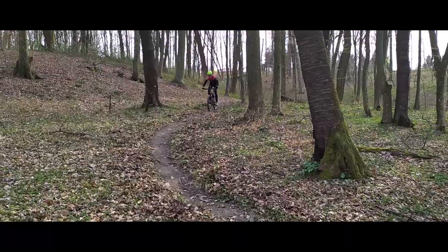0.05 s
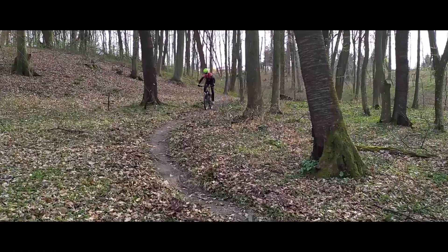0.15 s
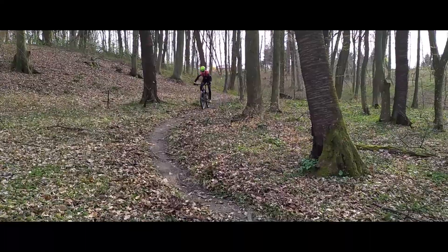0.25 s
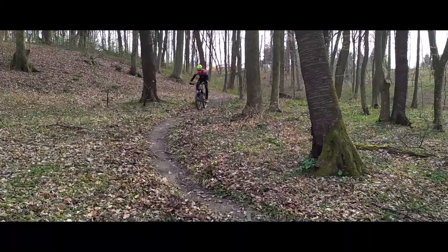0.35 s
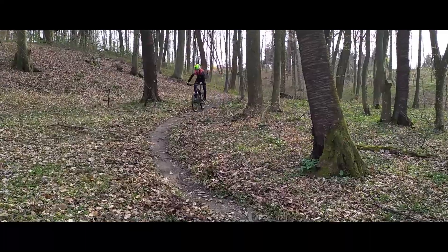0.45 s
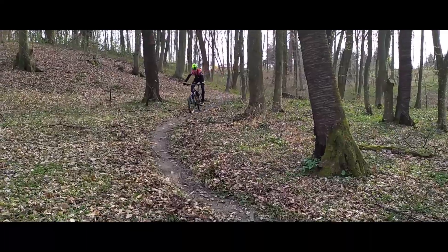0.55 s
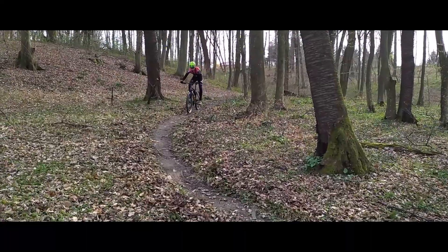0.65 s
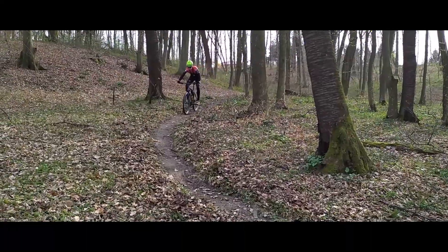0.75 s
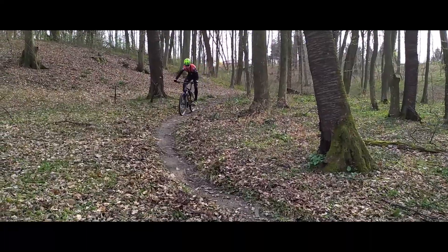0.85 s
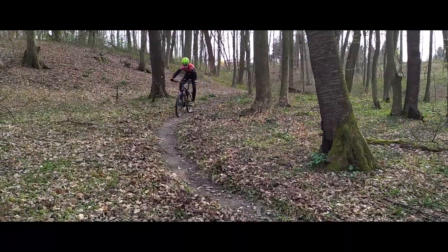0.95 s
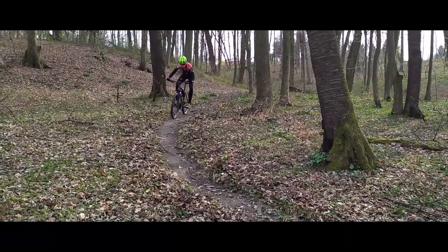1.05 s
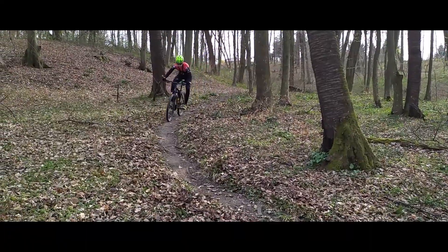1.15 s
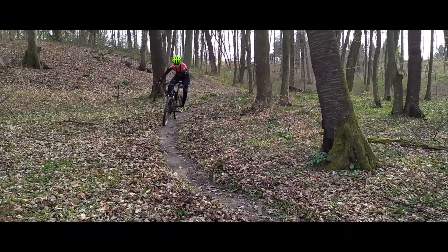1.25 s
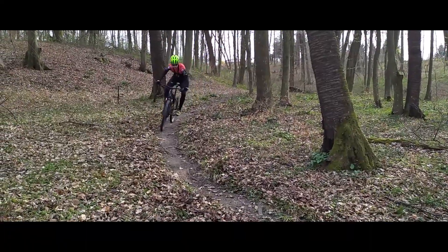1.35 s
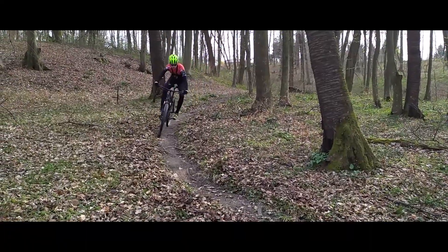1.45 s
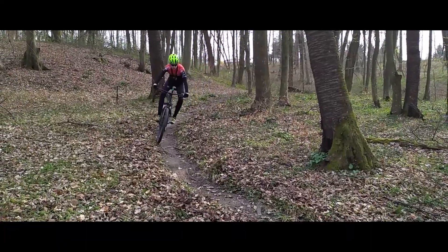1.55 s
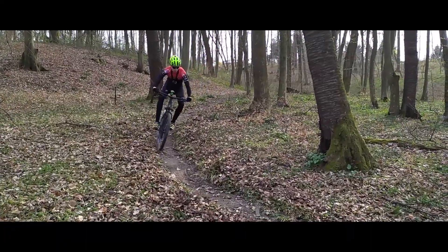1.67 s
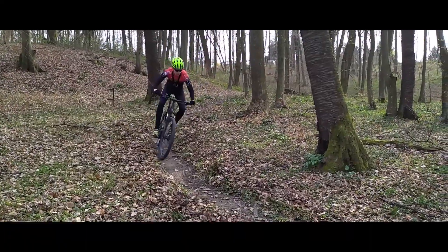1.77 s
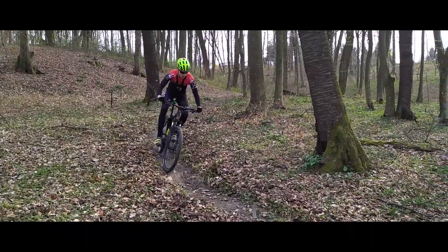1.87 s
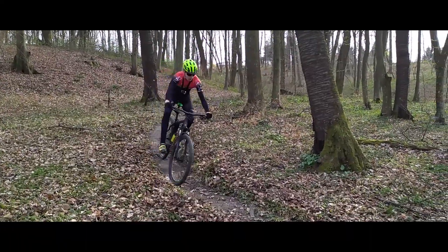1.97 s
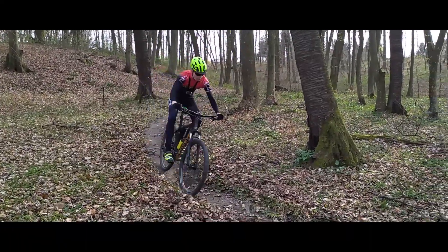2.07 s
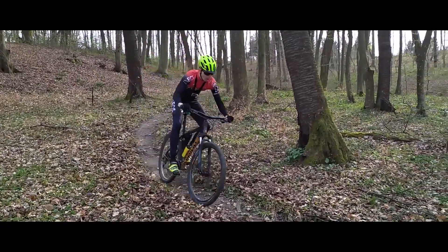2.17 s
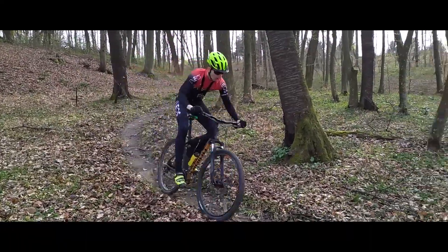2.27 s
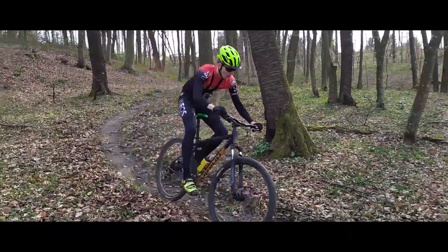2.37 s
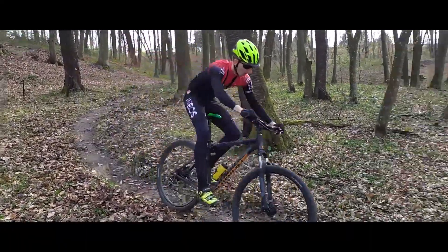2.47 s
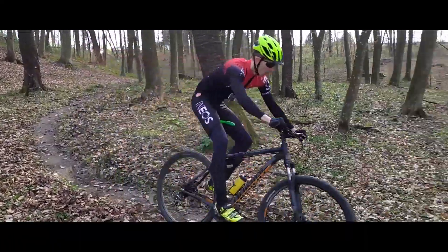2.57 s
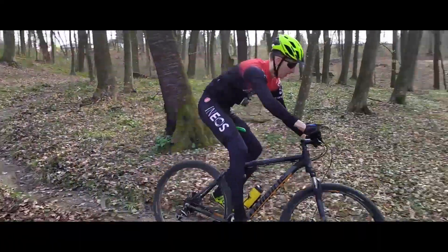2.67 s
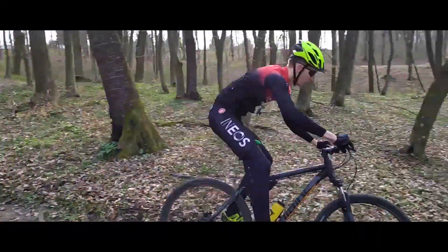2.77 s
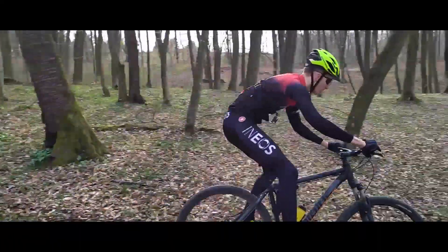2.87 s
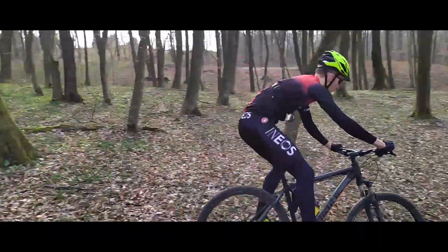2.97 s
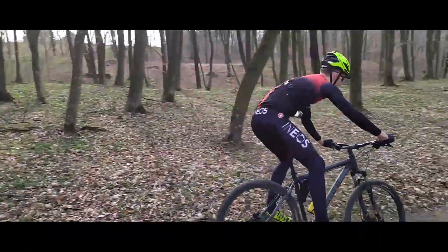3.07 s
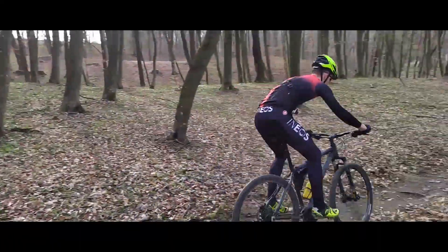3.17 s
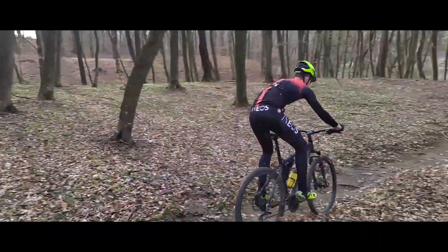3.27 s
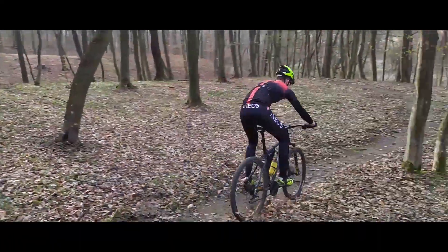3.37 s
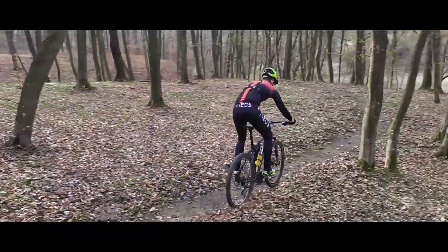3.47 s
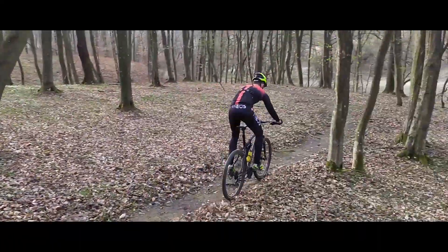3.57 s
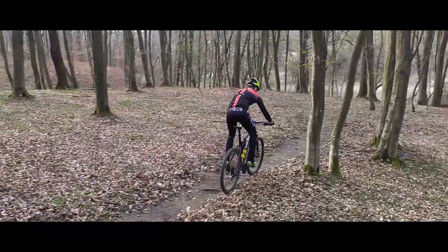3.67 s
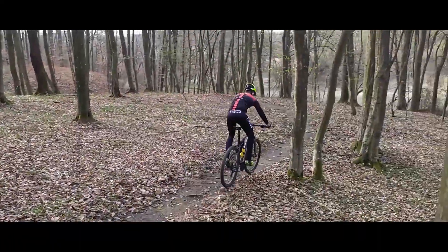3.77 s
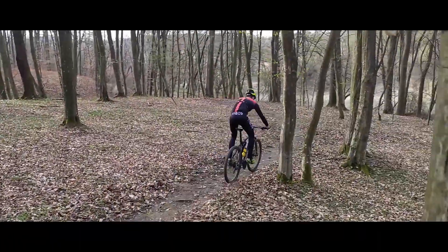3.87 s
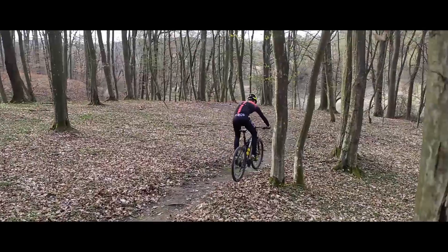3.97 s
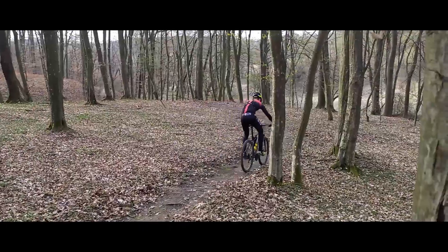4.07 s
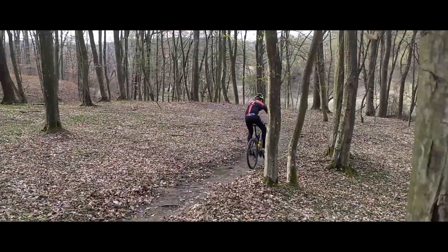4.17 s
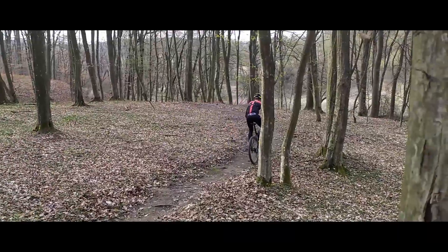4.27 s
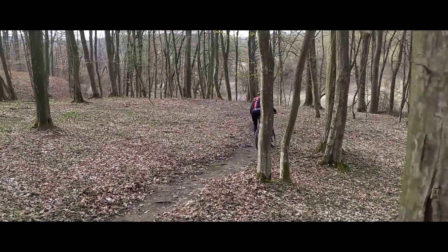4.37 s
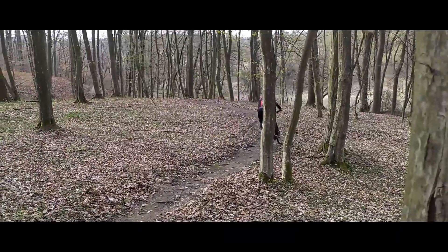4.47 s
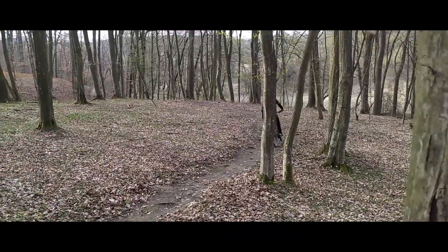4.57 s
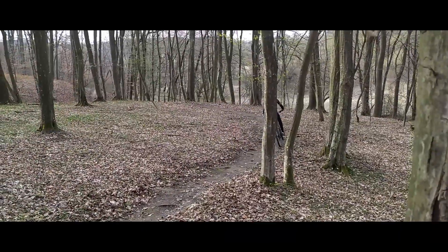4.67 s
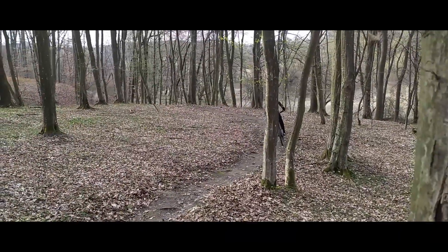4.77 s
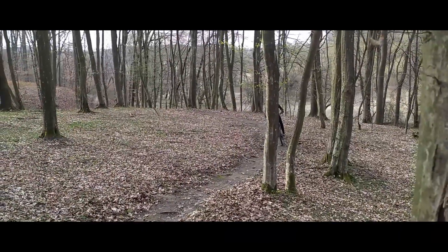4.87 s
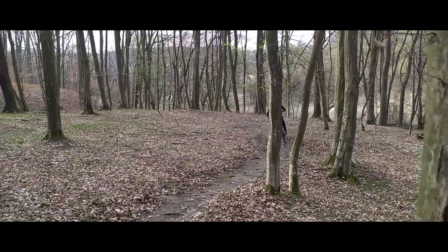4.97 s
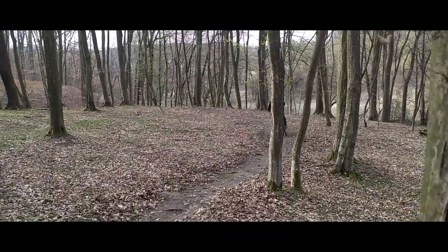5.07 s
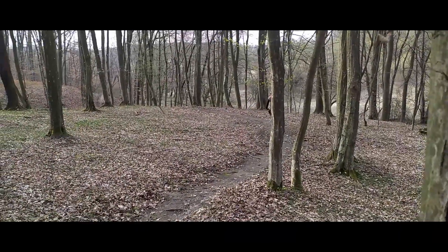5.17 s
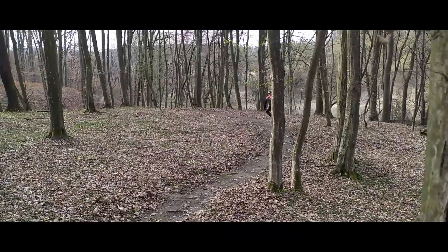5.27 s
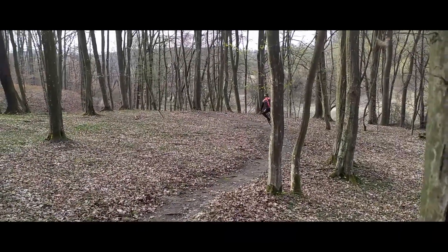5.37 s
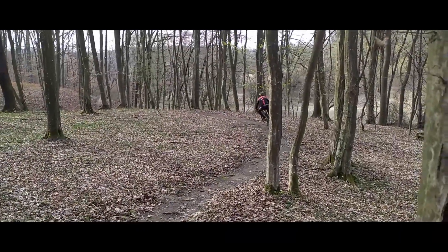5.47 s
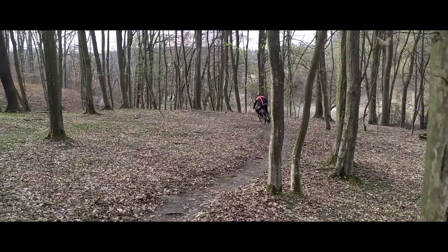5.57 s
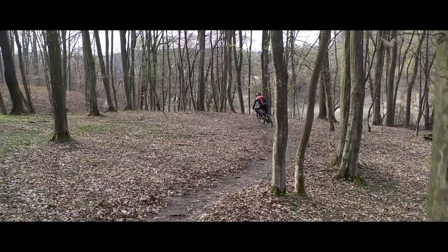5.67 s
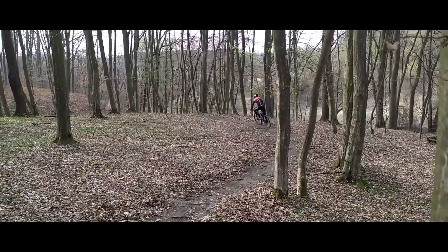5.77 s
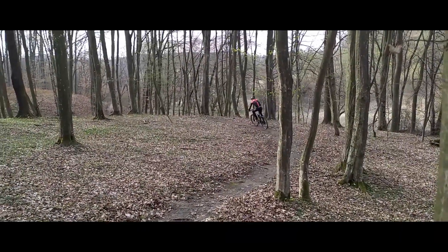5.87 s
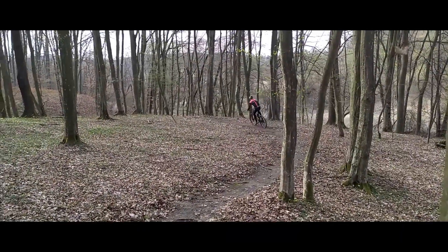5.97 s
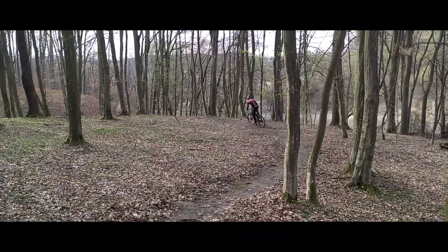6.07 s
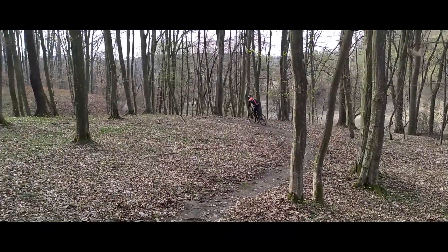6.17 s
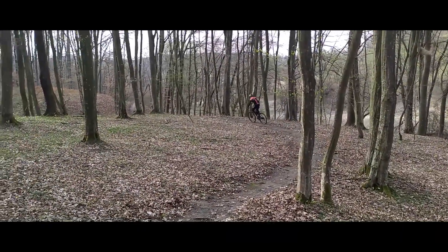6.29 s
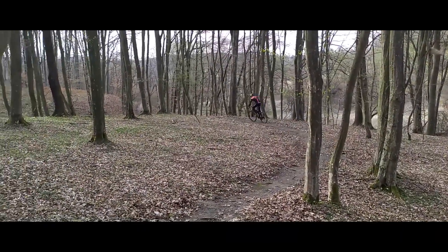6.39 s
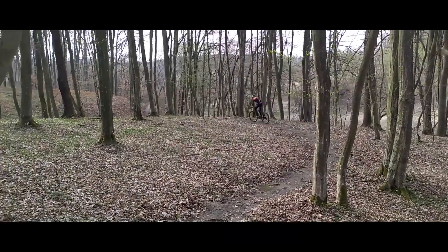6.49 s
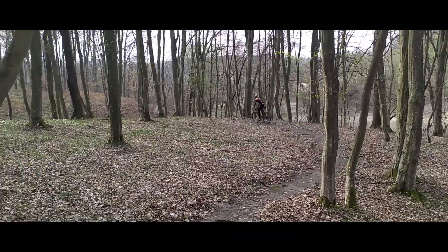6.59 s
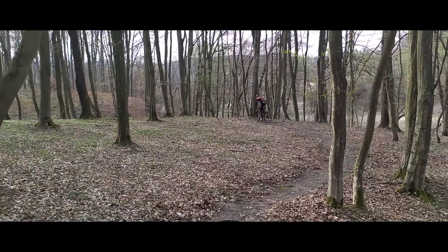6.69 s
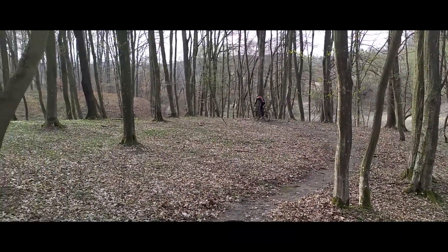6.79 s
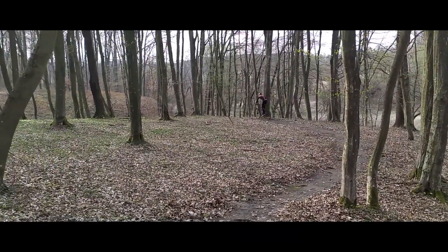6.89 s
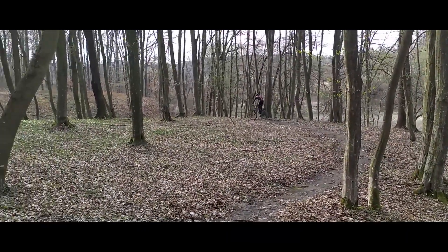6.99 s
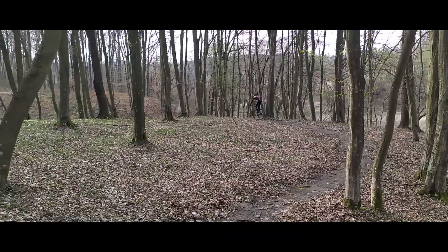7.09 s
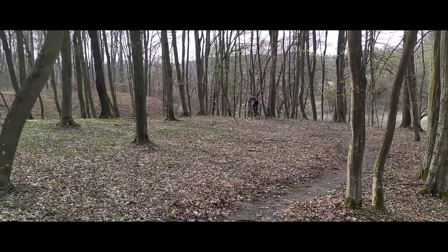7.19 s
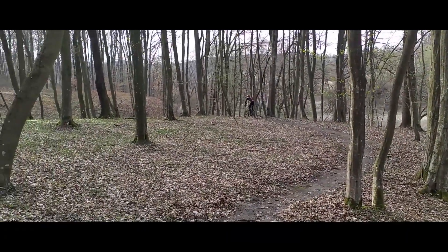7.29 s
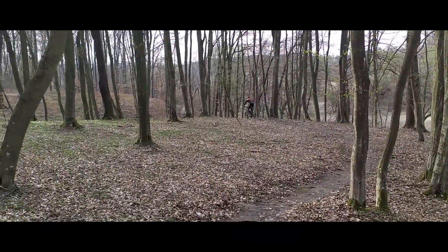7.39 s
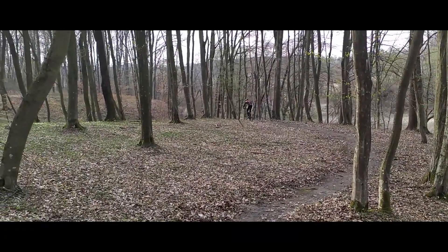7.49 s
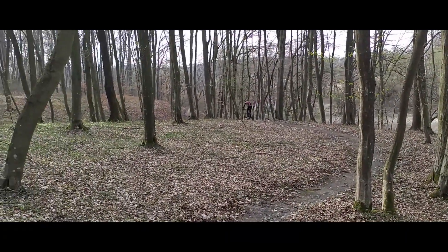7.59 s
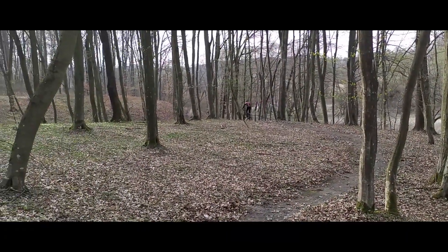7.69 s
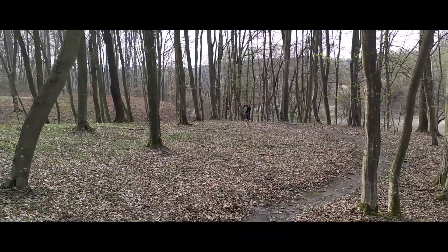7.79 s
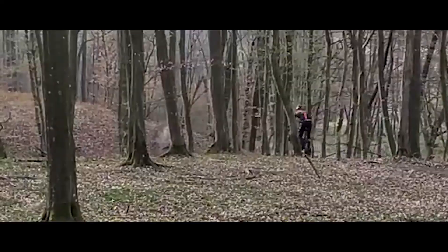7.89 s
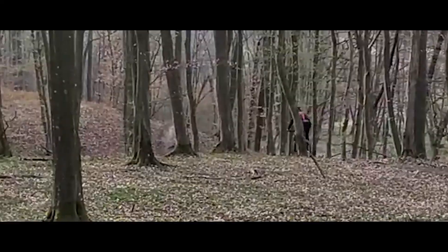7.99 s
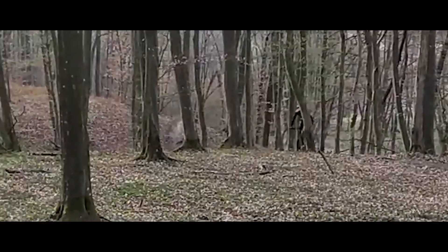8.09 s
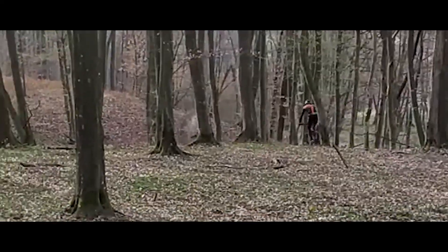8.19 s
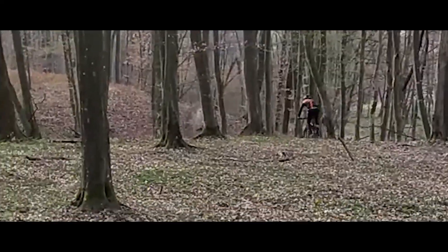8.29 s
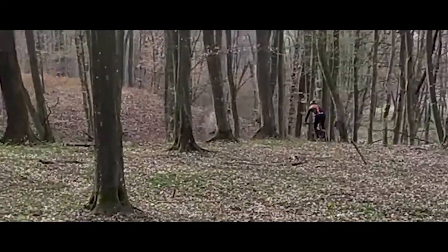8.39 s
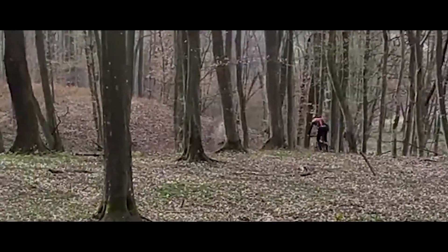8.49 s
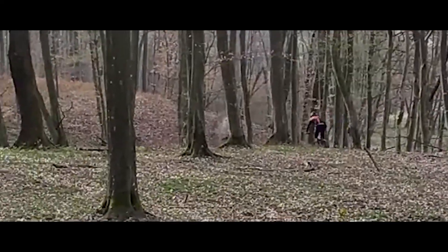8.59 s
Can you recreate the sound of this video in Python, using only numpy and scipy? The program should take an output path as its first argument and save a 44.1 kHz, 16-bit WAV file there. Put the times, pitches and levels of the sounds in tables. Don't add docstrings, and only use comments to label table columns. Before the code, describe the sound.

A mountain bike approaches through a quiet wood, tyres crackling over dry leaves and snapping twigs close by, then fades as a bird whistles.

```python
import sys
import numpy as np
from scipy import signal
from scipy.fft import rfft, irfft, next_fast_len
from scipy.io import wavfile
from scipy.ndimage import uniform_filter1d, minimum_filter1d, map_coordinates

SR = 44100
rng = np.random.default_rng(int(sys.argv[2]) if len(sys.argv) > 2 else 0)


def elevation(decibels):
    levels = np.asarray(decibels, float)
    return 10 ** (levels / 20)


def materialize(psi):
    bounded = np.clip(np.atleast_2d(psi).T, -1, 1)
    quanta = np.round(bounded * 32767).astype(np.int16)
    wavfile.write(sys.argv[1], SR, quanta)


N = 381024

# frequency_hz, level_db
LEAF = [(1180, -23.5), (2000, -19), (2700, -10), (3970, -7.5), (5400, -7), (6490, -6), (10700, -3),
        (14800, -10.5), (15800, -9.5), (16300, -62.5)]


def unit(x):
    return x / np.sqrt(np.mean(x ** 2) + 1e-20)


def along(points, hz):
    f, v = np.transpose(points)
    return np.interp(np.log(hz + 1), np.log(f + 1), v)


def wobble(rate):
    knots = rng.standard_normal(int(N * rate / SR) + 4)
    return map_coordinates(knots, [np.arange(N) * rate / SR])


def filtered(x, response):
    m = next_fast_len(x.shape[-1] + 1024)
    return irfft(rfft(x, m) * response(np.fft.rfftfreq(m, 1 / SR)), m)[..., :x.shape[-1]]


def pair(shape):
    # frequency_hz, likeness
    likeness = [(60, 0.97), (130, 0.84), (300, 1), (600, 0.093), (1500, 0.073), (4000, 0.15), (14000, 0.04)]
    turn = lambda hz: np.arccos(np.clip(along(likeness, hz), -1, 1)) / 2
    a, b = rng.standard_normal((2, *shape))
    mid = filtered(a, lambda hz: np.cos(turn(hz)))
    side = filtered(b, lambda hz: np.sin(turn(hz)))
    return np.array([mid + side, mid - side])


def grains(count, spread_db, life, bed):
    at, size = rng.random((2, count))
    hits = np.bincount((at * N).astype(int), elevation(-spread_db * np.log(size + 0.008)), N)
    return bed + unit(signal.lfilter([1], [1, -np.exp(-1 / (life * SR))], hits))


def patchy(x, depth_db):
    z = signal.stft(x, nperseg=256)[2]
    field = uniform_filter1d(rng.standard_normal(z.shape[1:]), size=14, axis=0)
    field = uniform_filter1d(field, size=9, axis=1)
    return signal.istft(z * elevation(depth_db * unit(field)), nperseg=256)[1][:, :N]


def panned(x, db):
    return x * elevation(np.array([db / 2, -db / 2]))


def placed(sounds, times):
    out = np.zeros((2, N + SR))
    for k, start in enumerate(np.round(np.ravel(times) * SR).astype(int)):
        out[:, start:start + sounds.shape[2]] += sounds[:, k]
    return out[:, :N]


def trunks(x, decay):
    hz, t, z = signal.stft(rng.standard_normal((2, SR // 2)), SR, nperseg=256)
    tail = signal.istft(z * elevation(-60 * t / along(decay, hz)[:, None]), SR, nperseg=256)[1]
    late = np.pad(x, (700, 0))[None]
    return signal.fftconvolve(late, tail / np.linalg.norm(tail[0]), axes=1)[:, :N]


def bearing(s):
    # start_s, left_right_db
    swing = [(0, -8), (1.2, -10.5), (1.9, -15.5), (2.5, -15.5), (2.75, -5), (3.9, -3.5), (5, -5),
             (8.64, -5)]
    return np.interp(s, *np.transpose(swing))


def hidden(s):
    broadside_s, open_s = 3.8, 1.48
    return 1 - np.exp(-((s - broadside_s) / open_s) ** 4)


def still_air():
    # frequency_hz, level_db
    air_curve = [(15, -27.5), (25, 0), (70, -6.5), (566, -36), (873, -26), (2960, -20), (9000, -18),
                 (16300, -30)]
    noise = unit(filtered(pair((N,)), lambda hz: elevation(along(air_curve, hz))))
    return elevation(-69 + 5.8 * wobble(2.61)) * noise


def ride():
    # start_s, level_db
    bite = [(0, -65), (.6, -56.5), (1.42, -60), (1.95, -53), (2.19, -43), (2.5, -44), (2.72, -34.5),
            (3.3, -30.5), (3.62, -44), (3.97, -46), (4.25, -57.5), (4.64, -55.5), (5.25, -62.5),
            (6.0, -73.5), (6.28, -57), (6.8, -75), (7.39, -59.5), (7.75, -66.5)]
    # start_s, level_db
    weight = [(0.0, -68.5), (0.12, -71), (0.14, -64), (0.79, -61), (1.01, -57.5), (1.18, -65),
              (2.19, -51.5), (2.26, -57), (2.6, -48), (2.74, -60), (3.61, -53), (4.67, -58), (5.29, -65),
              (7.2, -64.5), (8.64, -69.5)]
    t = np.arange(N) / SR
    bite_db = np.interp(t, *np.transpose(bite))
    ground_db = np.interp(t, *np.transpose(weight)) - 3.0
    dirt_db = -61 + 0.63 * (bite_db + 50.0) + 1.2 * wobble(7)
    ahead_db, behind_db, turn_s, turn_lasts_s = 6.5, -7.5, 3.57, 2.9
    going = .5 + .5 * np.tanh((t - turn_s) / turn_lasts_s)
    drum_db = ground_db + ahead_db + (behind_db - ahead_db) * going + 1.6 * wobble(12)
    return bite_db, dirt_db, drum_db, ground_db, bearing(t) + 5.2 * wobble(6)


def tyres():
    # frequency_hz, level_db
    dirt_curve = [(260, -8), (450, -0.5), (640, -16), (830, -1), (1260, 1.5), (1660, 2), (2050, 2),
                  (4000, -1), (5200, -2), (8800, -120)]
    # frequency_hz, level_db
    ground_curve = [(13, -41), (22, -39.5), (42, 3.5), (70, 4.5), (193, -7.5), (277, -13.5), (502, -18),
                    (547, -24), (700, -11.5), (910, -42.5), (1540, -120)]
    leaf_db, dirt_db, drum_db, ground_db, pan_db = ride()

    def coloured(envelope, points):
        noise = envelope * patchy(pair((N,)), depth_db=2.5)
        return unit(filtered(noise, lambda hz: elevation(along(points, hz))))

    def resonance(f, hz, width, db):
        return elevation(db) * 1j * f * width / (hz * hz - f * f + 1j * f * width)

    bumps = wobble(14)
    crush = grains(count=5000, spread_db=3.9, life=.0007, bed=1.6) * elevation(1.6 * bumps + .8 * wobble(35))
    leaf = coloured(crush, LEAF)
    far = 1.2 * hidden(np.arange(N) / SR)
    leaf -= far * filtered(leaf, lambda hz: 1 / (1 + (11000 / (hz + 1)) ** 8))
    dirt = panned(elevation(dirt_db + 6.0) * coloured(crush + 0.3, dirt_curve), 0.072 * pan_db - 2.5)

    knocks = grains(count=600, spread_db=4.5, life=0.003, bed=0.74)
    tyre = lambda f: resonance(f, 275.8, 23.7, 0) - resonance(f, 834, 140, -11)
    drum = unit(filtered(knocks * pair((N,)), tyre))
    ground = unit(filtered((knocks + 2.0) * pair((N,)), lambda f: elevation(along(ground_curve, f))))
    low = panned(elevation(drum_db - 2.5) * drum, np.array([3.5])) + elevation(ground_db + 2.5) * ground
    return panned(elevation(leaf_db + 0.5) * leaf, pan_db) + dirt + low


def bird():
    # start_s, top_hz, level_db
    whistles = [
        (.034, 3190, -61.5),
        (.369, 3240, -60.5),
        (.7, 3270, -61.5),
        (1.083, 3250, -62),
        (8.135, 3130, -65),
        (8.452, 3240, -63),
    ]
    # frequency_hz, t60_s
    far_decay = [(300, .43), (2000, .8), (3500, 1.1), (12000, .1)]
    start_hz, climb_s, hold_s, fade_db = 2270, .165, .09, 20
    lead_s = .00021
    t = np.arange(SR // 3) / SR
    s, top_hz, db = np.transpose(whistles)[:, :, None]
    u = np.clip(t / climb_s, 0, 1)
    hz = start_hz + (top_hz - start_hz) * (.45 * u + .55 * u * u * (2.6 - 1.6 * u))
    hz = hz + 30 * unit(uniform_filter1d(rng.standard_normal(hz.shape), size=900))
    edges = np.clip(np.minimum(t, climb_s + hold_s - t) / .035, 0, 1)
    level_db = db + .5 + 4.5 * u - fade_db * np.clip((t - climb_s) / hold_s, 0, 1)
    notes = elevation(level_db) * edges * np.sin(2 * np.pi * np.cumsum(hz, axis=1) / SR)
    song = placed(np.array([notes, notes]), s)[0]
    direct = song * elevation(-1.5 + 3 * wobble(130))
    ports = np.array([np.roll(direct, -round(lead_s * SR)), direct])
    return panned(ports, np.array([-2.5])) + elevation(-.5) * trunks(song, far_decay)


def thuds():
    # start_s, peak_db, pitch_hz
    drops = [(0.13, -38.5, 82.5), (0.381, -39.5, 91.5), (0.98, -35, 171), (1.75, -33.5, 302),
             (1.798, -42.5, 187), (1.967, -33, 80), (2.068, -29, 80.7), (2.19, -41, 108), (2.301, -42, 345),
             (2.342, -33, 316), (2.434, -34, 129), (2.525, -31, 88.8), (2.894, -39.5, 335),
             (3.817, -35.5, 268), (3.939, -32, 82), (6.7492, -41, 1020), (7.088, -38, 94),
             (7.268, -39, 113)]
    t = np.arange(SR // 8) / SR
    s, db, hz = np.transpose(drops)[:, :, None]
    push = elevation(db - 5.0 - 60 * t / 0.049) * np.sin(2 * np.pi * hz * t) * (1 - np.exp(-t / 0.00057))
    return placed(panned(push, np.full_like(db, 1.5)), s)


def snaps():
    # start_s, peak_db, pitch_hz
    ticks = [(.182, -49, 5070), (.218, -42.5, 5900), (.383, -40, 3830), (0.6108, -38, 2360),
             (0.636, -44, 6000), (1.058, -44, 6500), (1.548, -47, 5000), (1.5738, -39.5, 5530),
             (1.716, -37.5, 8150), (1.8327, -52, 8440), (1.8977, -37.5, 8050), (1.9872, -30, 7840),
             (2.5147, -24, 8360), (2.7831, -16, 8200), (3.7758, -20, 5000), (3.987, -39, 7170),
             (4.5862, -33, 8600), (4.6593, -50, 5470), (4.7473, -34, 2610), (4.921, -39, 2680),
             (5.3228, -54, 4310), (5.4364, -22, 6550), (5.691, -54, 2630), (6.0246, -57, 4970),
             (6.07, -45, 4960), (6.197, -40, 10200), (7.0426, -43.5, 9000), (7.285, -42, 4800),
             (7.899, -40, 3810), (8.2848, -39.5, 6000)]
    # start_s, peak_db, pitch_hz, t60_s
    twigs = [(.404, -23, 6600, 0.027), (.53, -37, 3250, 0.033), (.6975, -32, 7960, 0.03),
             (1.8444, -31.5, 8600, 0.039), (2.0011, -18.5, 8330, 0.024), (2.0282, -28, 8600, 0.024),
             (2.074, -30, 3540, 0.0087), (2.089, -15, 10450, 0.031), (2.9265, -16.5, 9100, 0.034),
             (2.289, -21.5, 7850, 0.011), (2.392, -26, 8900, 0.037), (2.8418, -16.5, 8950, 0.024),
             (2.9314, -7, 9400, 0.027), (3.0655, -26, 7300, 0.036), (3.5683, -37, 8500, 0.035),
             (3.7753, -21.5, 8700, 0.033), (3.896, -21, 4330, 0.012), (4.02, -23.5, 5600, 0.027),
             (4.0684, -12, 5330, 0.032), (4.07, -17, 10000, .04), (4.15, -20, 3230, 0.012),
             (4.2085, -22, 6360, 0.058), (4.3236, -31, 5200, 0.035), (4.9317, -29.5, 9900, 0.017),
             (5.436, -31, 10300, 0.039), (5.7833, -31.5, 10100, 0.038), (6.211, -37.5, 6550, 0.018),
             (6.8555, -38, 3420, 0.036), (7.1926, -34.5, 3900, 0.042), (8.5053, -38, 2550, 0.017)]
    # start_s, peak_db, pitch_hz, t60_s
    heaps = [(.4793, -33.5, 3630, 0.24), (1.0976, -33.5, 2950, 0.17), (1.4593, -38.5, 5760, 0.14),
             (1.6467, -30, 5670, 0.13), (1.9322, -33.5, 6860, 0.13), (2.3114, -23, 8700, 0.3),
             (2.355, -30, 10600, 0.047), (2.576, -19.5, 9500, 0.13), (2.6307, -23, 7400, 0.026),
             (3.747, -27, 3760, 0.044), (3.8423, -20.5, 3600, 0.039), (3.856, -19.5, 8800, 0.075),
             (3.968, -24.5, 4430, 0.04), (3.92, -27.5, 8800, .2), (4.459, -32, 12100, 0.04),
             (4.5485, -34.5, 4260, 0.021), (4.7805, -29.5, 8940, 0.056), (6.1617, -41, 4920, 0.12),
             (6.4178, -34, 8700, 0.091), (7.297, -25, 10800, 0.055), (7.419, -32.5, 3630, 0.14),
             (7.6645, -39, 3380, 0.034), (7.7366, -38.5, 4860, 0.1), (8.19, -40, 9250, 0.14)]
    # start_s, peak_db, pitch_hz
    spikes = [(.5325, -35, 5500), (.9825, -33, 5900), (1.9335, -26, 8100), (1.946, -25.5, 7900),
              (2.2455, -25, 7900), (2.2515, -26, 8000), (2.2695, -20.5, 7500), (2.277, -24.5, 8400),
              (2.287, -13.5, 7800), (2.356, -28, 7950), (2.385, -30, 8500), (2.428, -28, 8000),
              (2.832, -23, 9000), (2.9375, -7, 10000), (3.0665, -15.5, 7230), (3.0865, -12, 8850),
              (2.578, -28, 9500), (3.4583, -17.5, 4620), (2.989, -21, 3500), (3.897, -24, 9000),
              (4.0706, -14.5, 1620), (2.932, -18, 1600)]
    # start_s, peak_db, pitch_hz, t60_s
    drifts = [(.68, -42.5, 8000, .1), (2.12, -26, 8300, .14), (2.23, -29, 7750, .2),
              (2.492, -29.5, 8460, .2), (2.645, -17.5, 6640, .19), (2.668, -15, 6340, .19),
              (2.7, -27, 8100, .19), (2.805, -13, 10000, .14), (2.86, -21, 8500, .18),
              (2.917, -17.5, 9500, .12), (3.05, -18, 7500, .2), (3.13, -25, 4050, 0.15),
              (3.21, -24, 7900, 0.31), (3.3, -21, 5370, .2), (3.36, -25, 7000, .2), (3.41, -27, 6000, .2),
              (6.07, -47, 4000, .2), (6.11, -45.5, 5000, .2), (3.52, -19, 10900, .14)]
    # start_s, peak_db, pitch_hz
    clods = [(0.981, -35, 3200), (1.13, -34, 4150), (1.423, -50, 1030), (1.7485, -34.5, 7560),
             (1.797, -47, 2440), (2.2035, -39, 7900), (2.7615, -34, 9100), (3.092, -15.5, 8800),
             (4.073, -30, 1610), (4.2683, -30, 5930), (4.722, -34.5, 2400), (5.0631, -36, 3400),
             (5.187, -46.5, 1324), (6.0414, -49.5, 1190), (6.2431, -32, 2360), (6.747, -46, 990),
             (7.0857, -48, 990), (7.383, -34.5, 6700), (7.537, -42, 1090), (7.88, -43.5, 2200),
             (8.039, -40.5, 2630)]
    # rows, body_db under the bright part at a peak of -37 dB, rise_s, first crack 0-1
    kinds = [
        (twigs, -15.5, 0.0011, 0.58),
        (heaps, -15.5, 0.0015, 0.63),
        ([(*row, .04) for row in clods], -9.5, 0.0012, 0.46),
        (drifts, -23, 0.028, .02),
        ([(*row, .022) for row in ticks], -17.5, 0.0013, 0.55),
        ([(*row, .005) for row in spikes], -16, .0002, .5),
    ]
    t = np.arange(SR // 10) / SR
    rows = [(*row, *kind) for events, *kind in kinds for row in events]
    s, db, hz, t60, body_db, rise, crack = np.transpose(rows)[:, :, None]
    body_db = body_db - 0.47 * (db + 37.0)
    body_db = body_db + 2.5 * np.clip(np.log2(2520 / hz), 0, 2)
    pan_db = bearing(s) + rng.normal(0, 0.82, s.shape)

    fibres = unit(uniform_filter1d(rng.standard_normal((len(s), len(t))), size=50))
    ragged = elevation(3.0 * np.clip(t / 0.008, 0, 1) * fibres)
    fall = elevation(-60 * t / np.clip(t60, .003, .25))
    fall = fall + elevation(-18.5 - 60 * t / 0.21)
    fall = fall + crack * elevation(-60 * t / 0.003)
    burst = pair((len(s), len(t))) * ragged * fall
    burst = burst * (1 - np.exp(-t / rise)) * np.clip((t[-1] - t) / 0.017, 0, 1)

    splinters = hz * np.exp(rng.normal(0, .33, (len(s), 5)) * [0, 1, 1, 1, 1])
    rings = lambda f: sum(elevation(5.5) * f * 300 / np.hypot(c[:, None] ** 2 - f * f, f * 300)
                          for c in splinters.T)

    def brightness(f):
        leaf = elevation(np.clip(.3 - db / 60, .3, 1.3) * along(LEAF, f))
        return leaf * (1 + rings(f)) * (1 - 0.72 * hidden(s) / (1 + (11500 / (f + 1)) ** 8))

    def peak(x):
        power = uniform_filter1d(x * x, size=64).max(axis=2, keepdims=True).mean(axis=0)
        return x / np.sqrt(6 * power)

    bright = filtered(burst, brightness)
    body = filtered(burst, lambda f: (f * f / (f * f + 700 ** 2)) ** 2 / (1 + (f / 2200) ** 4))
    return placed(panned(elevation(db - 1.5) * (peak(bright) + elevation(body_db + 3.0) * peak(body)), pan_db), s)


def frame():
    # frequency_hz, level_db, t60_s
    tubes = [(858, 1, 0.48), (1180, 2, 0.46), (1714, 4, 0.35), (2330, 4, 0.33), (2690, 7, 0.37),
             (3690, 4, 0.28)]
    # start_s, level_db, struck_hz (tube struck hardest)
    jolts = [
        (.47, -66, 3600),
        (1.131, -71.5, 990),
        (4.72, -64, 1960),
        (5.06, -67, 1180),
        (5.062, -68.5, 3600),
    ]
    t = np.arange(SR // 3) / SR
    s, db, struck_hz = np.transpose(jolts)[:, :, None]
    hum = 0
    for hz, level_db, t60 in tubes:
        shake = unit(uniform_filter1d(rng.standard_normal((2, len(s), len(t))), size=350))
        fall_db = level_db - 6.8 * np.abs(np.log2(hz / struck_hz)) - 60 * t / t60
        hum = hum + elevation(fall_db) * (0.78 + 1.32 * shake) * np.sin(2 * np.pi * hz * t)
    return placed(panned(elevation(db + 10) * hum * (1 - np.exp(-t / .015)), bearing(s)), s)


def chain():
    # start_s, peak_db, left_right_db
    slaps = [
        (2.091, -43, -25),
        (2.935, -23.5, 3),
    ]
    # frequency_hz, level_db, t60_s
    partials = [(6750, -7, 0.1), (9150, 7.5, 0.064), (10900, 15, 0.041), (12600, -34, 0.47)]
    t = np.arange(SR // 5) / SR
    s, db, pan_db = np.transpose(slaps)[:, :, None]
    ring = 0
    for hz, level_db, t60 in partials:
        rattle = unit(uniform_filter1d(rng.standard_normal((2, len(s), len(t))), size=150))
        ring = ring + elevation(level_db - 60 * t / t60) * (0.52 + .5 * rattle) * np.sin(2 * np.pi * hz * t)
    return placed(panned(elevation(db + 7) * ring * (1 - np.exp(-t / 0.0073)), pan_db), s)


def shadowed(x):
    # frequency_hz, depth_db
    shadow = [(3000, 40), (4000, 23), (9000, 19), (16000, 12)]
    hz, _, z = signal.stft(x, SR, nperseg=256)
    power = (np.abs(z) ** 2).sum(axis=0)
    level_db = 10 * np.log10(uniform_filter1d(power, size=5, axis=0) + 1e-20)
    smooth_db = uniform_filter1d(level_db, size=15, axis=0)
    coming_db = np.roll(-minimum_filter1d(-smooth_db, size=5, axis=1), -3, axis=1)
    keep = level_db > coming_db - along(shadow, hz)[:, None]
    return signal.istft(z * keep, nperseg=256)[1][:, :N]


def gated(x):
    # frequency_hz, level_db
    mute = [(900, -60), (1500, -4.5), (2500, -2.6), (4600, -2), (10000, -1.9), (12000, -1), (14000, -.3),
            (16000, 0)]
    steady_top_hz, burst_db = 15480, 7
    k, n, start = np.arange(1024), np.arange(2048), 1024 - 197
    basis = np.sin(np.pi * (n + .5) / 2048) * np.cos(np.pi / 1024 * np.outer(k + .5, n + 512.5))
    halves = np.pad(x, ((0, 0), (start, 2048 - (start + N) % 1024))).reshape(2, -1, 1024)
    z = np.concatenate([halves[:, :-1], halves[:, 1:]], axis=2) @ basis.T
    power = (z * z).reshape(2, -1, 256, 4).sum(axis=(0, 3))
    level_db = 10 * np.log10(uniform_filter1d(power, size=3, axis=0) + 1e-20)
    hz = k[2::4] * SR / 2048
    keep = level_db - signal.medfilt2d(level_db, (1, 15)) > along(mute, hz)
    treble_db = level_db[:, 80:170].mean(axis=1)
    keep &= (hz < steady_top_hz) | (treble_db - np.roll(treble_db, 1) > burst_db)[:, None]
    back = (z * np.repeat(keep, 4, axis=1)) @ basis / 512
    out = np.pad(back[..., :1024], ((0, 0), (0, 1), (0, 0)))
    out = out + np.pad(back[..., 1024:], ((0, 0), (1, 0), (0, 0)))
    return out.reshape(2, -1)[:, start:start + N]


def scene():
    # frequency_hz, t60_s
    near_decay = [(300, .3), (1500, .35), (6000, .35), (12000, .15)]
    breaks = snaps() + frame() + chain()
    answer = elevation(-10.5) * trunks(breaks.mean(axis=0), near_decay)
    return still_air() + tyres() + bird() + thuds() + breaks + answer


def low_pass(x):
    return signal.sosfilt(signal.butter(12, 16480, fs=SR, output="sos"), x)


def record(dry):
    # frequency_hz, delay_s
    lag = [(400, .00005), (1100, .00025), (3000, .0002), (6000, .0006), (16000, .00065)]
    hiss = filtered(rng.standard_normal(dry.shape), lambda hz: 1 / (1 + (10000 / (hz + 1)) ** 4))
    dry = dry + elevation(-68) * hiss
    left = filtered(dry[0], lambda hz: np.exp(-2j * np.pi * hz * along(lag, hz)))
    both = filtered(np.array([left, dry[1]]), lambda hz: (hz < 15900) / (1 + (40 / (hz + 1)) ** 4))
    return low_pass(gated(shadowed(both)))


dry = scene()
out = record(dry)
materialize(out)
```